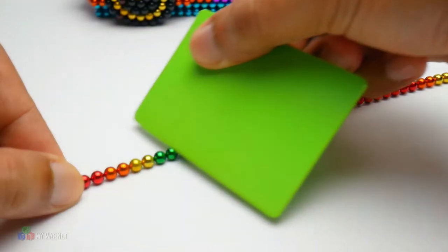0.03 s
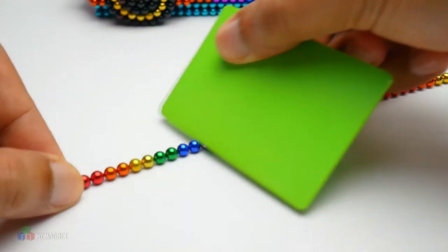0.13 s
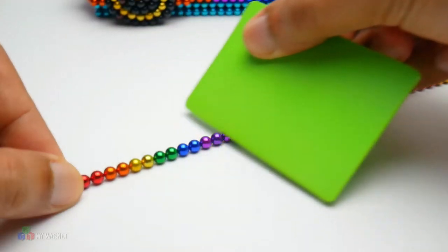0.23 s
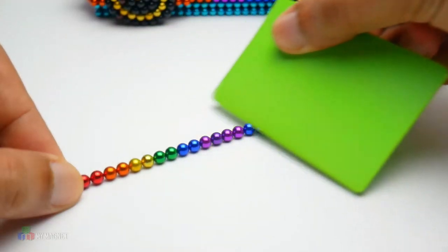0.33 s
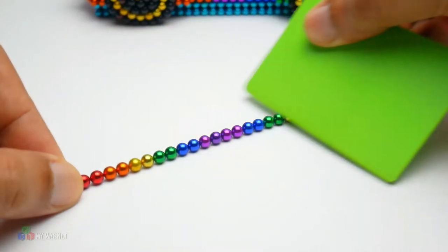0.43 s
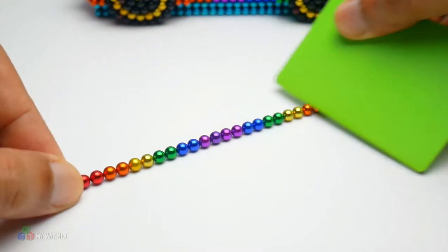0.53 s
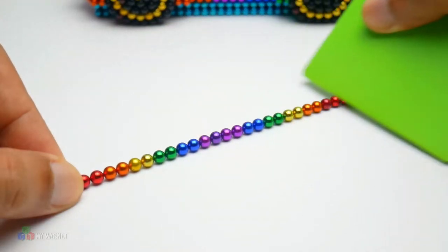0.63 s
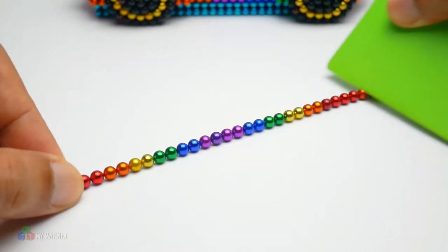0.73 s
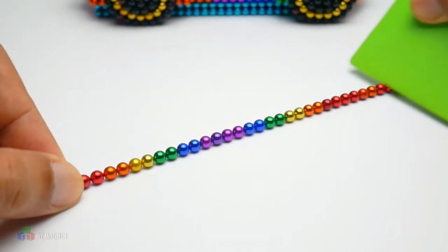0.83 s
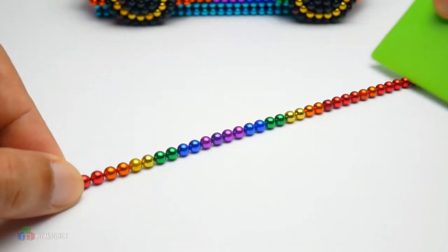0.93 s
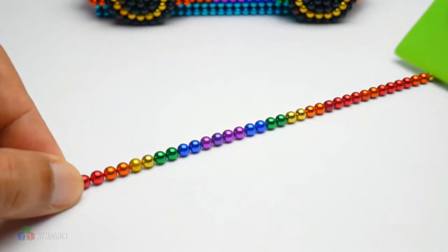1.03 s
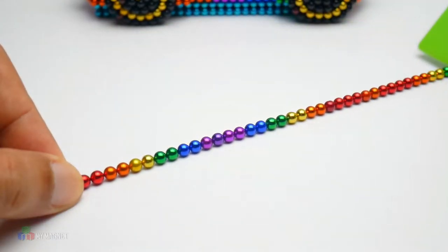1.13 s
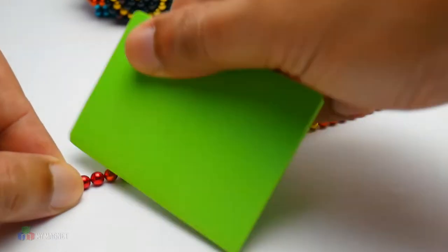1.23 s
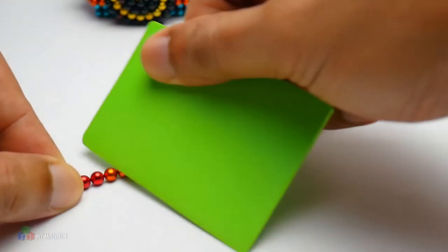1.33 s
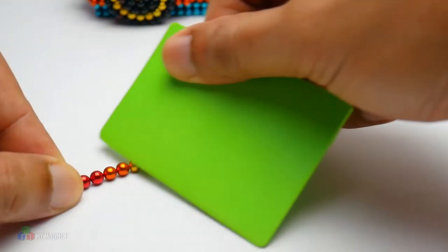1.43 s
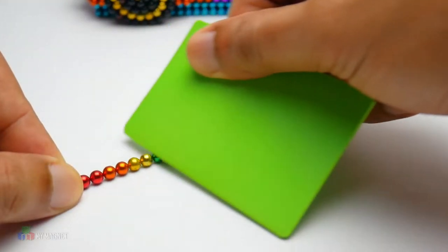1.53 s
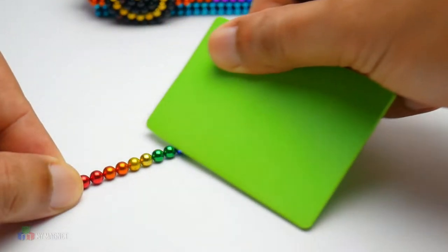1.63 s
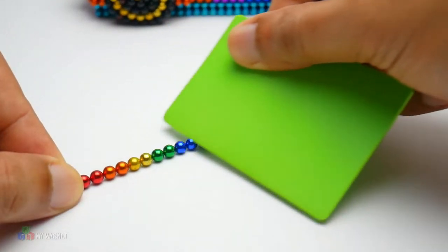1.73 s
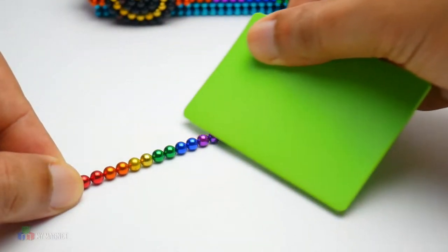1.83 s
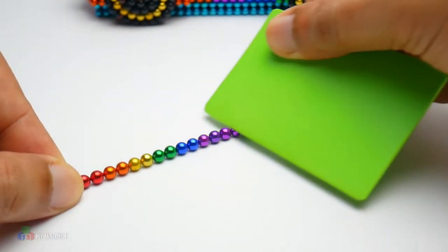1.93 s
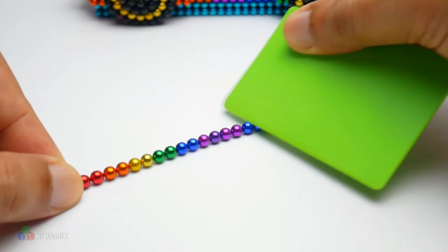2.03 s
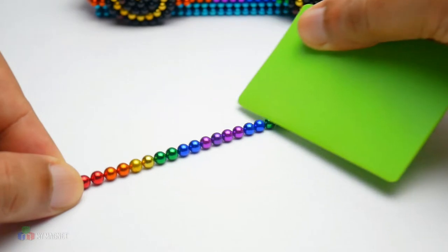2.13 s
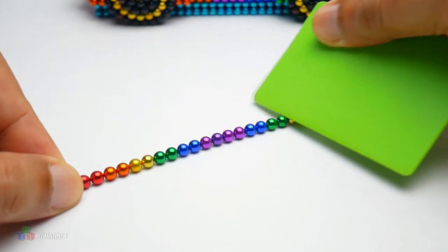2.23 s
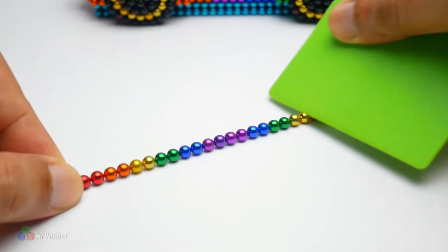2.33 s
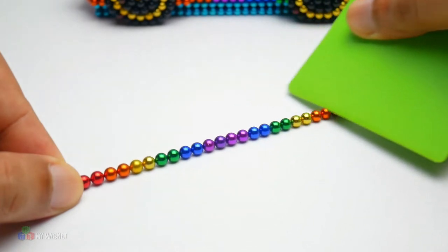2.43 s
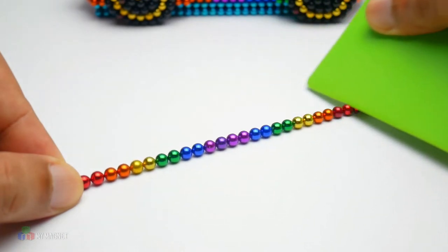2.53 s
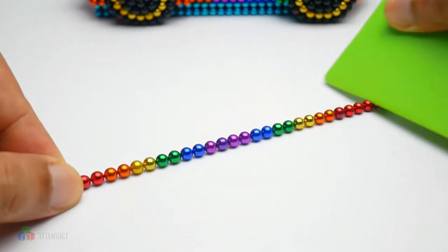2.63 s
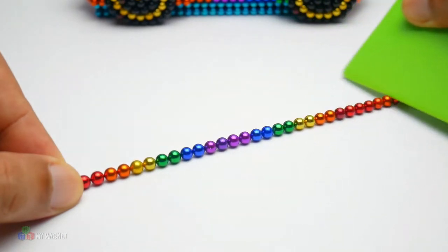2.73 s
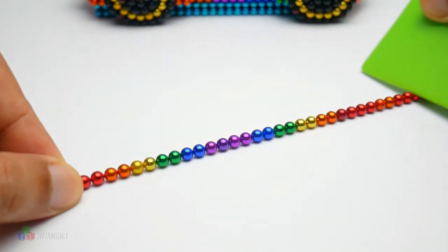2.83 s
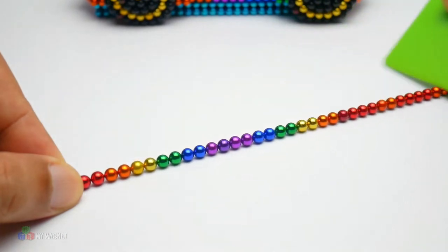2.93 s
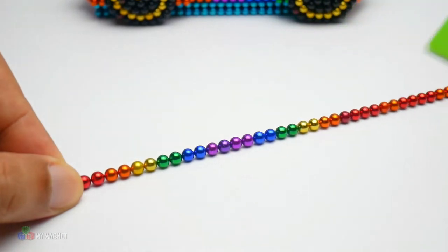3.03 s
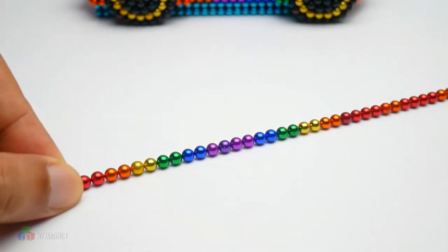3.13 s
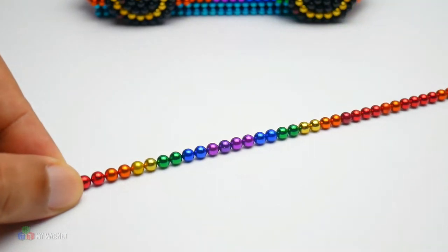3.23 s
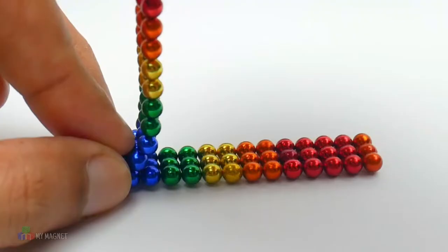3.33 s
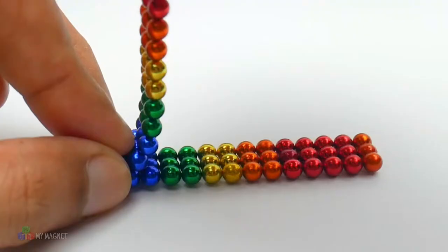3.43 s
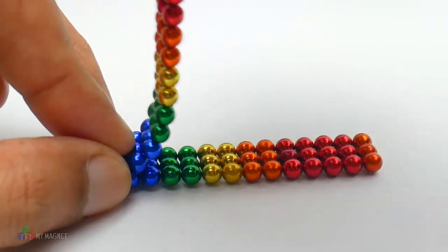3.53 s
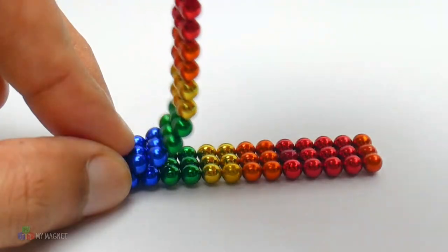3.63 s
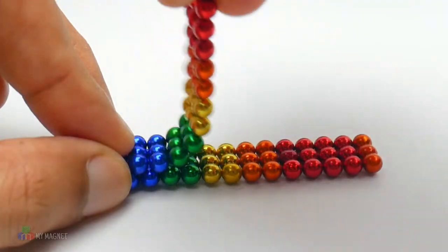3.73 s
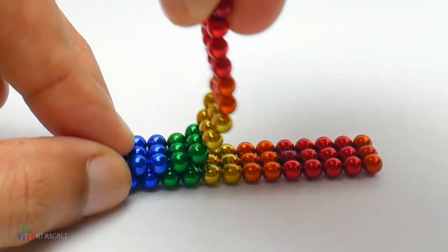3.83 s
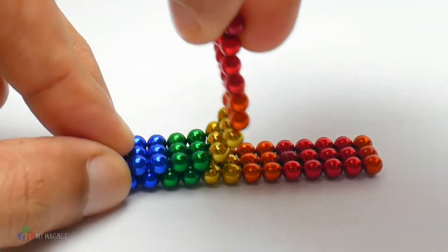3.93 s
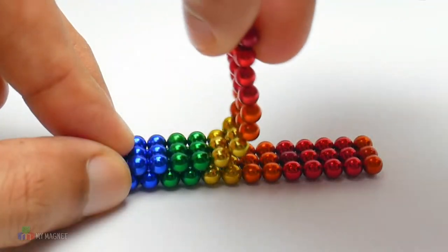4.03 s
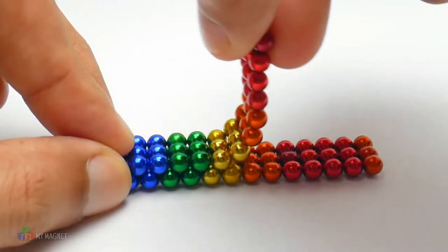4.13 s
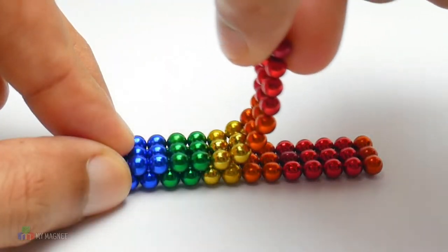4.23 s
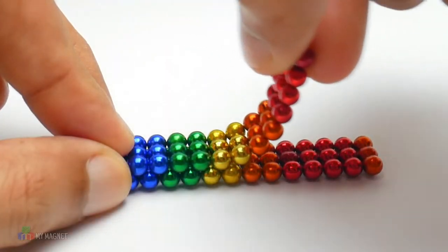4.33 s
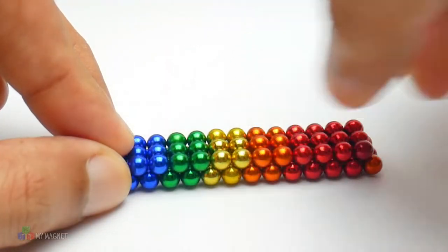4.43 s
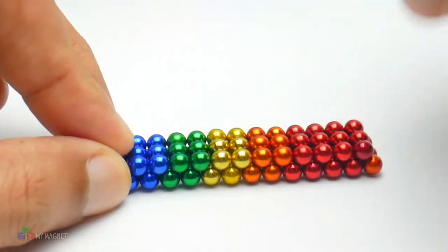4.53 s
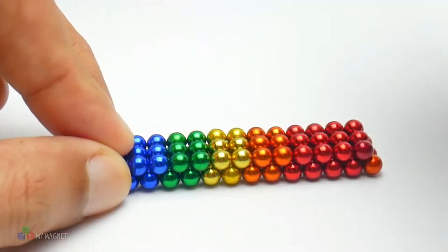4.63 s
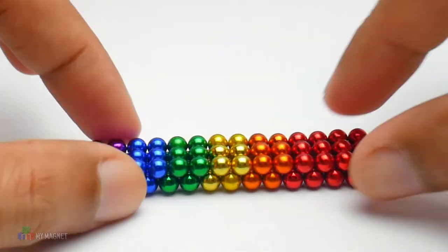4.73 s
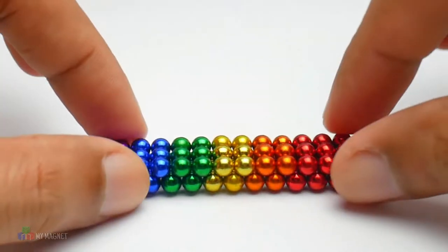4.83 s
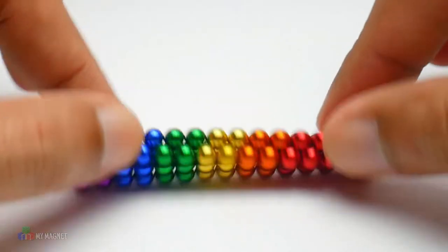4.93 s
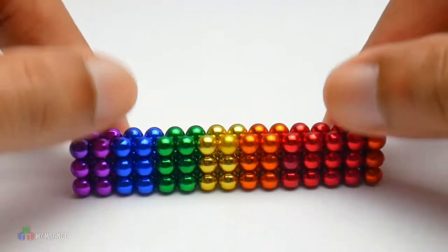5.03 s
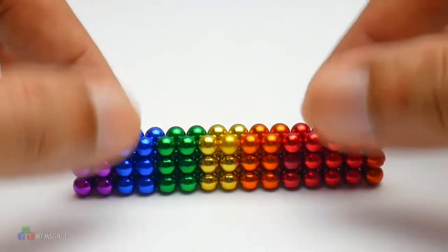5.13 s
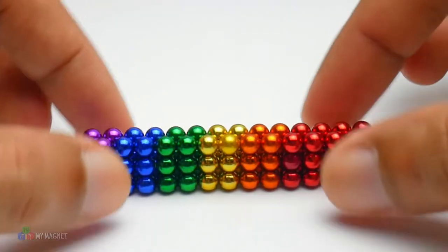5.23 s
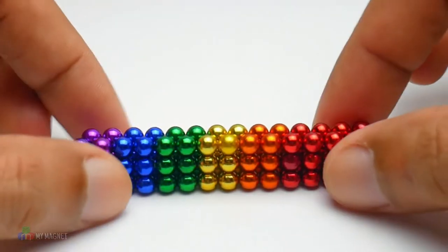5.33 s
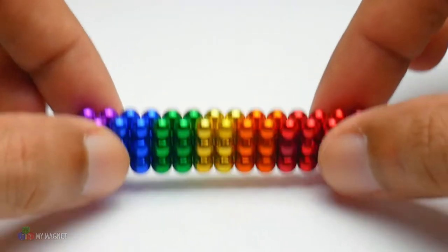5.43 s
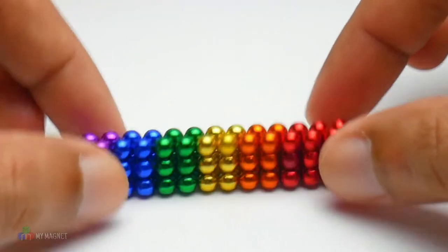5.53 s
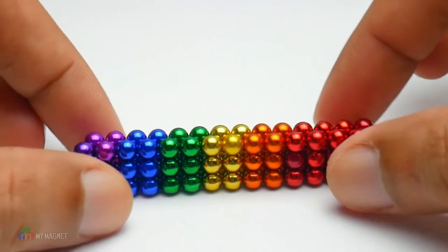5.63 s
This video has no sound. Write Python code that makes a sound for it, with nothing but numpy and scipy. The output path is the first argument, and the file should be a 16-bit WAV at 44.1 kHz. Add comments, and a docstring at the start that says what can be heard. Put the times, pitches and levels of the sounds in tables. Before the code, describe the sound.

Close microphone, small dry room, nearly centred stereo. From 0 to 1.3 s a plastic card is pulled along a chain of small magnetic balls: a brisk ratchet of about thirty-five crisp ticks, roughly 20 to 35 per second, each with a short hollow card ring and tiny table thump. After a slight gap, a second stroke runs from 1.4 to 3.1 s, slower at first, about 17 per second, quickening near the end with brighter chatter and rising thumps. Soft finger rumble follows from about 3.4 s. Between 3.7 and 4.2 s irregular light metallic clicks mark balls joining a block; at 4.45 to 4.5 s a tight cluster ends in a sharp crack. Faint mains buzz lies beneath. Handling rubs softly; around 5 s a short low judder rises in pitch, with small knocks. At 5.6 s the block collapses in a very loud, clipped clack with rapid tiny bounces.

```python
"""A brisk run of ticks: a plastic card is dragged twice along a chain of small magnetic balls, its edge
dropping into every gap, so each drop is a tick, a ring of card modes, a treble chatter and a table thump.
Then a strand is wound onto a block of balls and snaps shut: noise-burst cracks over ringing modes and thuds.
Fingers shift the block with filtered-noise rumble and rub, and it judders over the table by stick-slip.
Its rows collapse with a clack that overloads the close microphone. Small, dry room; faint mains buzz."""
import sys
import numpy as np
from scipy import signal
from scipy.fft import rfft, irfft
from scipy.io import wavfile
from scipy.ndimage import uniform_filter1d

SR = 44100
rng = np.random.default_rng(int(sys.argv[2]) if len(sys.argv) > 2 else 0)


def wav_record(signal):
    """Record a signal, one row per channel, as 16-bit PCM in the file named by sys.argv[1]."""
    frames = np.transpose(np.atleast_2d(signal))
    bounded = np.clip(frames, -1, 1)
    # unit amplitude maps onto the largest positive 16-bit level
    quanta = np.round(bounded * 32767).astype(np.int16)
    wavfile.write(sys.argv[1], SR, quanta)


N = 251370
TIME = np.arange(N) / SR  # s, whole scene
AGE = TIME[:8192]  # s since contact, for one hit

# modes of card and chain: f/Hz, t60/s, relative level/dB at the held end, the same at the far end
CARD_MODES = [(948, 0.03, -14, -23), (1050, 0.082, -17.5, -11.5), (1412, 0.068, -15, -35),
              (1656, 0.058, -13, -15), (1995, 0.078, -14.5, -8.5), (2122, 0.072, -21.5, -5.5),
              (2375, 0.045, -13.5, -5), (2567, 0.018, -30.5, 4), (3020, 0.06, -56, 7),
              (3214, 0.031, -17, -15), (3340, 0.05, -26, -9), (4010, 0.022, -10.5, -7)]
# modes of the table under the chain, before any pitch rise: same columns
TABLE_MODES = [(137, 0.068, -18, -10), (281, 0.05, -11, -1.5), (364.4, 0.025, 0.5, 3), (403, 0.044, 2, 1),
               (477, 0.021, -15, -16)]
# modes of the block of balls, before detuning: f/Hz, relative level/dB
BLOCK_MODES = [(1620, -16), (2530, -14), (3290, -22), (4250, -25)]

# colour of the card edge ticking on a ball: f/Hz, relative level/dB
EDGE_TICK = [(200, -29), (900, -4.5), (1700, -1), (3500, 9), (5000, 5.5), (6200, -18.5), (8000, -36),
             (16000, -23.5)]
# colour of the edge buzzing after the tick: f/Hz, relative level/dB
EDGE_BUZZ = [(300, -17), (800, -10), (1600, -8), (2400, 5), (4000, -2.5), (5500, -10.5), (8000, -26.5)]
# colour of treble chatter between balls: f/Hz, relative level/dB
CHATTER_COLOUR = [(3000, -22), (6200, -5.5), (7400, 1.5), (10000, -4.5), (13000, -8), (16000, -38)]
# colour of the crack through touching balls: f/Hz, relative level/dB
BALL_CRACK = [(300, -45), (900, -5), (1400, 4), (2400, 4.5), (4100, 0), (5800, -20.5), (16000, -36)]
# colour of the block knocking the table: f/Hz, relative level/dB
BLOCK_THUD = [(30, -34), (90, -18), (160, -6), (350, 2.5), (620, -8), (900, -29), (3000, -45)]
# colour of the fingertip rumble: f/Hz, relative level/dB
RUMBLE_COLOUR = [(30, -29), (70, -21), (120, -8), (160, 0), (215, -4), (260, -5), (330, -4), (420, -8),
                 (520, -21.5), (900, -30), (3000, -83)]
# colour of balls rubbing together or scraping: f/Hz, relative level/dB
FRICTION_COLOUR = [(300, 5.5), (700, 3), (1200, 3), (2400, 0.5), (3600, -2.5), (5500, -18), (9000, -21),
                   (15000, -31)]
# colour of skin sliding on the balls: f/Hz, relative level/dB
SKIN_HISS = [(2000, -12), (8000, -2), (15000, -6)]
# colour of the wall echoes: f/Hz, relative level/dB
ROOM_COLOUR = [(100, -6.5), (400, -0.5), (900, -1), (2300, -3.5), (5000, -6.5), (9000, -2.5), (16000, -5)]
# colour of the sideways part of the sound: f/Hz, relative level/dB
SIDEWAYS_COLOUR = [(60, -5), (380, -4.5), (700, 3), (1290, -0.5), (2380, -12), (4400, -9), (8100, 1.5),
                   (15000, -6.5)]

# the card's travel in the first stroke; its edge drops once per gap: t/s, gaps passed
FIRST_PULL = [(.0046, 0), (.1133, 2), (.2938, 6), (.4108, 9), (.5704, 14), (.7047, 18), (.8132, 21),
              (.9347, 24), (1.1262, 29), (1.2286, 32), (1.2548, 33), (1.2942, 35)]
# the card's travel in the second stroke: t/s, gaps passed
SECOND_PULL = [(1.3817, 0), (1.4659, 1), (1.6904, 5), (1.9296, 9), (2.0362, 11), (2.0947, 12), (2.2919, 15),
               (2.4113, 17), (2.7532, 24), (2.8857, 27), (2.9635, 29), (2.9918, 30), (3.0336, 32),
               (3.0815, 35), (3.1186, 38)]
# strokes along the chain: travel, share of the chain covered, relative treble chatter level/dB,
# strongest ring f/Hz at the start, f/Hz at the end (both before scatter),
# relative level/dB of the card's lowest modes, which a firm grip damps
PULLS = [(FIRST_PULL, 0.69, -19.5, 1910, 2170, 2.2), (SECOND_PULL, 0.89, -13.5, 2340, 2260, -1.6)]
# how hard the card is pressed on: t/s, base level/dB of a drop
PRESSURE = [(0, -32), (.42, -26), (.9, -26.5), (1.27, -29), (1.38, -29), (1.47, -24.5), (2.3, -25),
            (3.06, -26.5), (3.12, -31)]
# the edge catches on a ball and drops harder: t/s, extra level/dB
CATCHES = [(.06, 2), (.443, 3), (.571, 2), (.671, 1), (.935, 3.5), (1.294, 6.5), (2.224, 1), (2.412, 3.5),
           (2.656, 2.5), (2.704, 2.5), (3.033, 2)]
# balls snapping onto the block: t/s, level/dB, table thud level/dB, strand ring f/Hz
SNAPS = [(3.6832, -30.5, -33.5, 1920), (3.754, -30.5, -38, 2290), (3.7936, -29, -29, 2750),
         (3.8441, -28.5, -33, 2340), (3.8575, -30, -31, 1460), (3.9851, -30, -30, 1230),
         (3.997, -35, -47, 1330), (4.1061, -31, -34, 2280), (4.116, -31.5, -29, 1520),
         (4.1357, -33, -52, 1380), (4.183, -36, -49, 1900), (4.41, -41, -49, 1610),
         (4.462, -30, -25.5, 1350), (4.4743, -25, -27.5, 2090), (4.488, -19.5, -20.5, 4040),
         (4.4945, -11, -41, 3280), (5.0597, -36, -25, 1080), (5.074, -38, -40, 3430),
         (5.3203, -41.5, -53, 3570), (5.5908, -9, -25, 3720), (5.594, -8.5, -6.5, 2310),
         (5.597, -2, -14, 2030)]
# treble chatter by snap strength; the hardest snaps lock the balls: snap level/dB, relative level/dB
SNAP_CHATTER = [(-23, -20), (-24, -6.5), (-10.5, -14), (-7, -35)]
# the block judders over the table: t/s, level/dB, mean slip rate f/Hz
SLIDE_PATH = [(4.966, -66, 301), (4.982, -27, 308.4), (5.014, -27, 334.6), (5.03, -31.5, 394.4),
              (5.059, -40, 512), (5.08, -38, 600), (5.11, -62, 597)]
# fingers hold, press or turn the balls: start t/s, end t/s, rumble level/dB, friction level/dB,
# skin hiss level/dB
GRIPS = [(1.44, 1.463, -37.5, -50, -78), (3.434, 3.722, -37.5, -53.5, -76), (3.68, 4.462, -39, -49.5, -86),
         (4.653, 4.93, -39.5, -52.5, -70), (4.967, 5.09, -30.5, -45.5, -57.5), (5.19, 5.7, -35, -49.5, -63)]

# above this rate the edge skims and no longer falls right into the gaps
SKIM_GAPS_PER_S, SKIM_DB_PER_OCTAVE = 22, -3.5
CHATTER_RISE_DB = 5  # from the held end of the chain to the loose end
DROP_SCATTER_DB, RING_SCATTER = 1, .1  # RING_SCATTER is the spread of log pitch
LOW_MODES_UNDER_HZ = 1200
# the collapsed block bounces on the table, a little weaker each time
BOUNCE_START_S, BOUNCE_GAP_S, BOUNCE_LOSS_DB = 5.614, 0.01, -0.5
FIRST_BOUNCE_DB, FIRST_BOUNCE_THUD_DB, BOUNCE_HZ = -33, -20.5, 1800
REST_RUMBLE_DB, REST_FRICTION_DB = -50, -59.5  # a fingertip resting on the chain
GRIP_ATTACK_S, GRIP_RELEASE_S = 0.078, 0.1
SURGE_DB, SURGE_S = 2.5, 0.079  # the fingers' pressure is never even
MAINS_HZ, BUZZ_START_S, BUZZ_DB, BUZZ_HZ = 50, 3.8, -56, 2550
ROOM_T60_S, BLOCK_ROOM_DB, SIDE_DB = 0.23, -12.5, -5.5


def card(tick_db=-4, buzz_db=-8, ring_db=-8, modes_db=-1, thump_db=-4, chatter_db=-1, bounce_db=-12,
         near_notch_hz=5700, far_notch_hz=6600, low_cut_hz=140):
    """At each gap the edge ticks on a ball and bounces, the card rings, the chain chatters, the table thumps."""
    out = np.zeros((2, N))
    tick = response(EDGE_TICK, size=len(AGE))
    buzz, chatter = response(EDGE_BUZZ), response(CHATTER_COLOUR)
    for s, along, db, click_rel, treble_rel, hz, low_db in drops():
        # the tick's reflection off the table thins one band, which moves as the card travels
        notch_hz = near_notch_hz + along * (far_notch_hz - near_notch_hz)
        reflection = 0.34 * np.interp(AGE - .5 / notch_hz, AGE, tick, left=0)
        click = hit_level(np.outer([1, 0], tick + reflection), tick_db)  # mid only

        # the contact point decides which modes answer; the grip detunes them a little
        for k, (f, t60, near_db, far_db) in enumerate(CARD_MODES):
            detune, push = rng.standard_normal(2)
            mode_db = near_db + along * (far_db - near_db) + modes_db + 2.6 * push
            if f < LOW_MODES_UNDER_HZ:
                mode_db += low_db
            click += (-1) ** k * ring(f * (1 + 0.0092 * detune), t60, mode_db)
        click += rattle(hz, .011, .03, ring_db)
        click += burst(buzz, 0.04, buzz_db)

        # as the card runs right out to the chain's end, the thump rises in pitch
        rise = np.interp(s, [2.3, 2.85], [1, 1.27])
        thump = sum(ring(f * rise, t60, near_db + along * (far_db - near_db))
                    for f, t60, near_db, far_db in TABLE_MODES)

        add(out, s, undb(db + click_rel) * click)
        add(out, s, burst(chatter, 0.028, db + treble_rel + chatter_db))
        add(out, s + 0.00088, hit_level(thump, db + thump_db))  # the table gives way a moment later
        edge_bounce = rattle(1640, 0.0054, 0.022, db + click_rel + bounce_db)
        add(out, s + rng.uniform(0.00278, .007), edge_bounce)
    return high_pass(out, low_cut_hz)


def drops():
    """Yield each drop of the edge as the card moves on gap by gap, skimming when fast and catching at times.

    Columns: t/s, share of the chain, pressure level/dB, relative click level/dB, relative chatter level/dB,
    ring f/Hz, relative level/dB of the low modes."""
    for travel, reach, chatter_db, first_hz, last_hz, low_db in PULLS:
        s, passed = np.transpose(travel)
        gaps = np.arange(passed[-1] + 1)
        times = np.interp(gaps, passed, s)
        progress = gaps / gaps[-1]
        along = reach * progress
        pressure_db = np.interp(times, *np.transpose(PRESSURE))

        uneven, detune = rng.standard_normal((len(gaps), 2)).T
        gaps_per_s = 1 / np.gradient(times)
        skim_db = SKIM_DB_PER_OCTAVE * np.log2(np.maximum(gaps_per_s / SKIM_GAPS_PER_S, 1))
        catch_db = sum(db * (abs(times - when) < .007) for when, db in CATCHES)
        click_rel = skim_db + catch_db + DROP_SCATTER_DB * uneven
        treble_rel = chatter_db + CHATTER_RISE_DB * along + catch_db / 2
        hz = (first_hz + progress * (last_hz - first_hz)) * np.exp(RING_SCATTER * detune)
        low_modes_db = np.full(len(gaps), low_db)
        yield from zip(times, along, pressure_db, click_rel, treble_rel, hz, low_modes_db)


def snaps(crack_db=-5, rattle_db=-3, ring_db=-14, thud_db=0, tail_db=-18, chatter_db=0,
          block_t60=0.069, block_detune=.015, thin_share=0.39, low_cut_hz=105):
    """Magnets jump together: a crack runs through touching balls, the block rings and knocks the table."""
    out = np.zeros((2, N))
    crack, thud, chatter = response(BALL_CRACK), response(BLOCK_THUD), response(CHATTER_COLOUR)
    for s, db, knock_db, hz in SNAPS + bounces():
        treble_rel = np.interp(db, *np.transpose(SNAP_CHATTER))
        # a gentle landing leaves the balls rattling; a hard snap locks them at once
        settle_t60 = np.interp(db, [-28, -12], [.1, .024])
        contact = burst(crack, settle_t60 / 2, crack_db)
        contact += burst(crack, 0.069, tail_db)
        contact += burst(chatter, 0.038, treble_rel + chatter_db)
        contact = high_pass(contact, thin_share * hz)  # a short, high-pitched strand gives a thin crack

        # the loose strand rings at a pitch set by its free length
        strand = rattle(hz, 0.0056, settle_t60, rattle_db) + ring(hz, .022, ring_db)
        # the block's own modes shift a little from snap to snap
        block = sum(ring(f * (1 + block_detune * rng.standard_normal()), block_t60, mode_db)
                    for f, mode_db in BLOCK_MODES)
        add(out, s, undb(db) * (contact + strand + block))
        add(out, s, burst(thud, 0.024, knock_db + thud_db))
    return high_pass(out, low_cut_hz)


def bounces(count=4):
    """The block's landings after its collapse, each losing energy, as rows like those of the snaps."""
    rows = []
    for k in range(count):
        loss_db = k * BOUNCE_LOSS_DB
        s = BOUNCE_START_S + k * BOUNCE_GAP_S
        rows.append((s, FIRST_BOUNCE_DB + loss_db, FIRST_BOUNCE_THUD_DB + loss_db, BOUNCE_HZ))
    return rows


def slide(jitter=0.133, scrape_db=-9):
    """Uneven stick-slip on the table: a low judder with a scrape at every slip."""
    s, db, hz = np.transpose(SLIDE_PATH)
    wander = uniform_filter1d(rng.standard_normal(N), size=120)
    slip_hz = np.interp(TIME, s, hz) * (1 + jitter * wander / wander.std())
    phase = np.cumsum(slip_hz) / SR  # in slips
    slip_decay = np.exp(-(phase % 1) / 0.75)
    scrape = through(rng.standard_normal((2, N)) * slip_decay, response(FRICTION_COLOUR))
    judder = np.sqrt(2) * np.array([np.sin(2 * np.pi * phase), np.cos(2 * np.pi * phase)])
    level = undb(np.interp(TIME, s, db, left=-np.inf, right=-np.inf))  # silent outside the slide
    return (judder + undb(scrape_db) * scrape / scrape.std()) * level


def handling(tick_db=-3, tick_hz=2500, count=30):
    """Fingers rumble and rub softly on the balls, which tick faintly as they shift."""
    force = []
    for start, end, *_ in GRIPS:
        attack = np.minimum(TIME - start, 0) / GRIP_ATTACK_S
        release = np.maximum(TIME - end, 0) / GRIP_RELEASE_S
        force.append(np.exp(attack - release))
    force = np.array(force)
    # where grips overlap, the strongest is heard
    press, rub, slip = (np.max(undb(db)[:, None] * force, axis=0) for db in np.transpose(GRIPS)[2:])

    rumble, friction, hiss = (through(rng.standard_normal((2, N)), response(colour))
                              for colour in (RUMBLE_COLOUR, FRICTION_COLOUR, SKIN_HISS))
    for when, size in rng.random((count, 2)):
        add(friction, when * N / SR, 2 * size * rattle(tick_hz, 0.0083, 0.0048, tick_db))
    rumble_gain = np.hypot(press * surge(), undb(REST_RUMBLE_DB))
    friction_gain = np.hypot(rub, undb(REST_FRICTION_DB))
    return rumble * rumble_gain + friction * friction_gain + hiss * slip


def surge():
    """Slow random swell of a finger's pressure, as a gain near 1."""
    width = int(SURGE_S * SR)
    wander = uniform_filter1d(uniform_filter1d(rng.standard_normal(N), width), width)
    return undb(SURGE_DB * wander / wander.std())


def mains_buzz(ring_t60=0.0063):
    """A faint electrical buzz under the work on the block: a tiny tick in every mains cycle."""
    out = np.zeros((2, N))
    for s in np.arange(BUZZ_START_S, TIME[-1], 1 / MAINS_HZ):
        add(out, s, rattle(BUZZ_HZ, ring_t60, 0.0041, BUZZ_DB))
    return out


def room(x, onset_s=0.0039):
    """Diffuse wall echoes that build up, then fade, as (mid, side)."""
    build_up = 1 - np.exp(-(AGE / onset_s) ** 2)
    echoes = rng.standard_normal((2, len(AGE))) * fade(ROOM_T60_S) * build_up
    echoes /= np.sqrt(np.sum(echoes[0] ** 2))
    return through(through(x, echoes), response(ROOM_COLOUR))


def ring(hz, t60, db=0):
    """One struck mode, as (mid, side); its sideways part changes from blow to blow."""
    turn = 2 * np.pi * hz * AGE
    mode = np.array([np.sin(turn), rng.standard_normal() * np.cos(turn)])
    return hit_level(mode * fade(t60), db)


def rattle(hz, ring_t60, t60, db):
    """A resonance kept going by chattering contacts, so its pitch is rough."""
    return burst(ring(hz, ring_t60)[0, :1024], t60, db)


def burst(h, t60, db=0):
    """Dense micro-collisions that die away, coloured by h, as (mid, side)."""
    collisions = rng.standard_normal((2, len(AGE))) * fade(t60)
    return hit_level(through(collisions, h), db)


def fade(t60):
    """Exponential decay from the moment of contact, down 60 dB after t60 seconds."""
    return np.exp(-np.log(1000) * AGE / t60)


def hit_level(x, db=0):
    """Scale a (mid, side) hit so that its mid energy equals db held for 12 ms."""
    return x * undb(db) * np.sqrt(.012 * SR / np.sum(x[0] ** 2))


def undb(db):
    """Decibels to gain."""
    return 10 ** (np.asarray(db) / 20)


def response(points, size=2048):
    """Causal impulse response of unit energy with an (f/Hz, level/dB) colour, by folding the cepstrum."""
    hz, db = np.transpose(points)
    grid = np.maximum(np.fft.rfftfreq(size, 1 / SR), 1)
    gain = undb(np.interp(np.log(grid), np.log(hz), db))
    cepstrum = irfft(np.log(gain))
    cepstrum[1:size // 2] *= 2
    cepstrum[size // 2 + 1:] = 0
    h = irfft(np.exp(rfft(cepstrum)))
    return h / np.sqrt(np.sum(h ** 2))


def through(x, h):
    """Pass a sound through an impulse response, keeping its length."""
    return signal.fftconvolve(np.atleast_2d(x), np.atleast_2d(h), axes=-1)[:, :x.shape[-1]]


def high_pass(x, hz):
    """Small things radiate almost no bass."""
    return signal.sosfilt(signal.butter(3, hz, "high", fs=SR, output="sos"), x)


def add(track, s, x):
    """Mix x into the track at time s."""
    i = int(np.clip(s * SR, 0, N - 1))
    track[:, i:i + x.shape[1]] += x[:, :N - i]


def scene(card_room_db=-12, lean=0.25, lean_hz=700):
    """Everything sounds near the middle, wider in some bands than others; the bass leans left."""
    chain = card()
    block = snaps() + handling() + slide() + mains_buzz()
    room_send = undb(card_room_db) * chain[0] + undb(BLOCK_ROOM_DB) * block[0]
    mid, side = chain + block + room(room_send)
    side = undb(SIDE_DB) * through(side, response(SIDEWAYS_COLOUR))[0]
    side += lean * signal.sosfilt(signal.butter(1, lean_hz, fs=SR, output="sos"), mid)
    return np.array([mid + side, mid - side])


def record(dry, low_cut_hz=55, top_hz=15250):
    """The loudest snaps flatten at full scale; the deepest bass and the top are cut."""
    clipped = dry / (1 + dry ** 6) ** (1 / 6)
    bass_cut = signal.sosfilt(signal.butter(1, low_cut_hz, "high", fs=SR, output="sos"), clipped)
    return signal.sosfilt(signal.ellip(8, .2, 80, top_hz, fs=SR, output="sos"), bass_cut)


dry = scene()
out = record(dry)
wav_record(out)
```